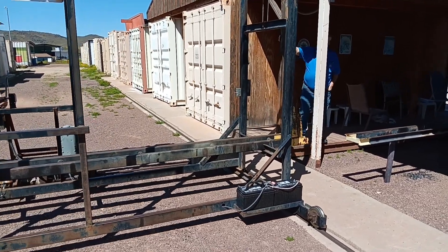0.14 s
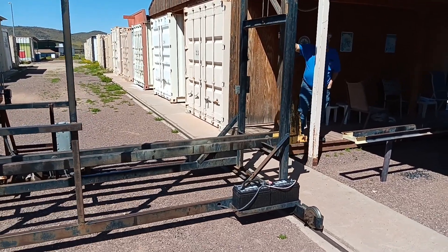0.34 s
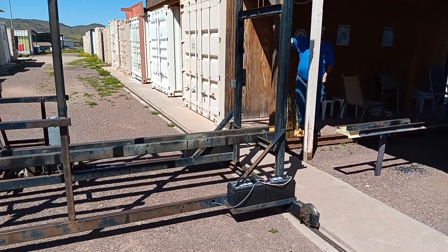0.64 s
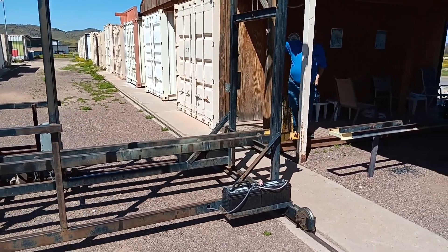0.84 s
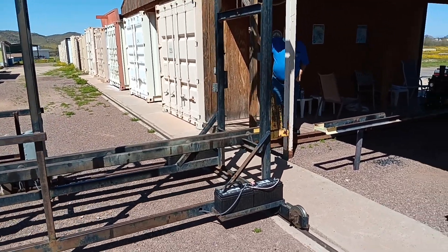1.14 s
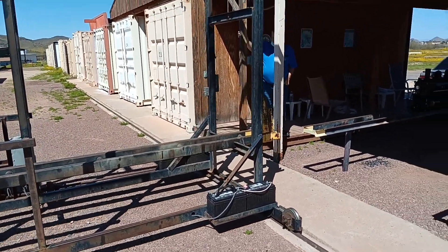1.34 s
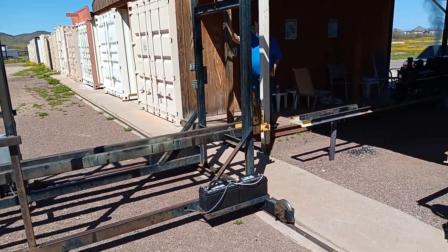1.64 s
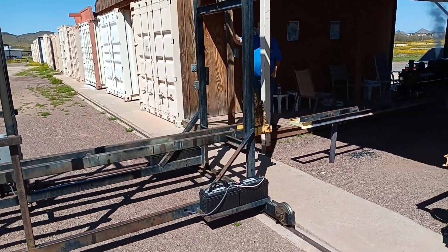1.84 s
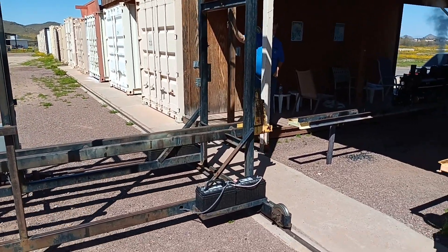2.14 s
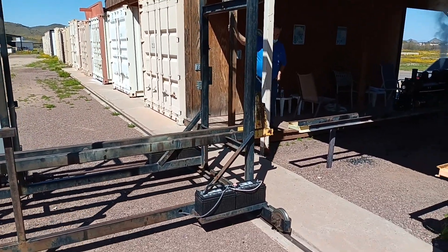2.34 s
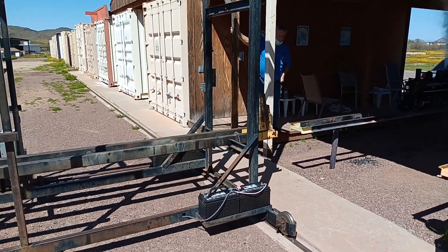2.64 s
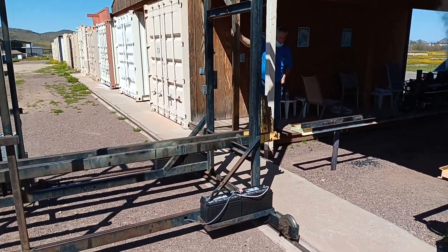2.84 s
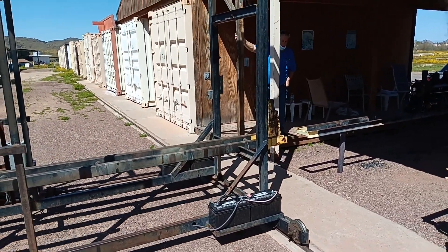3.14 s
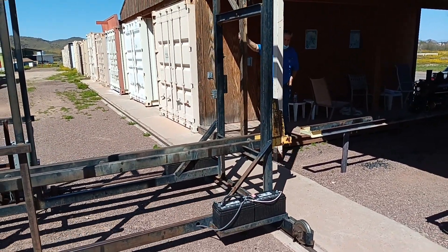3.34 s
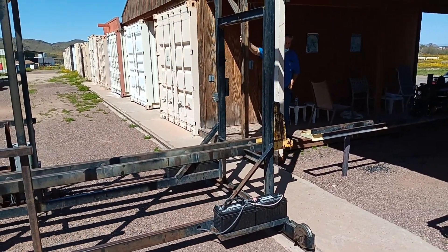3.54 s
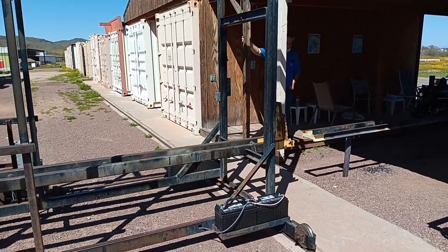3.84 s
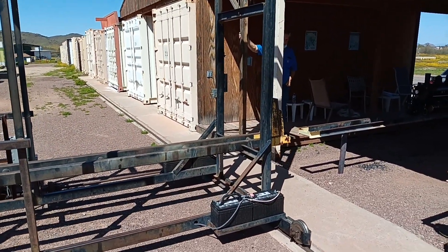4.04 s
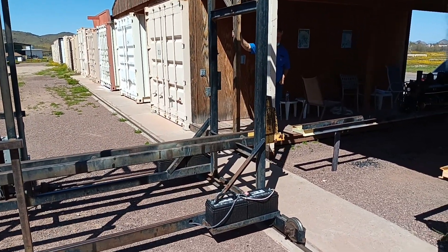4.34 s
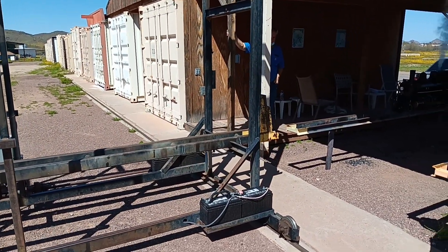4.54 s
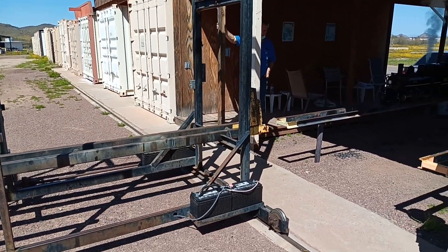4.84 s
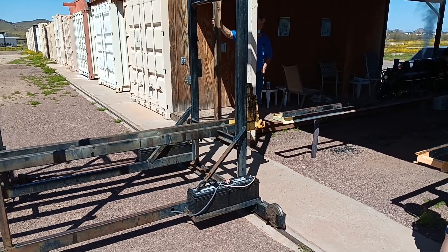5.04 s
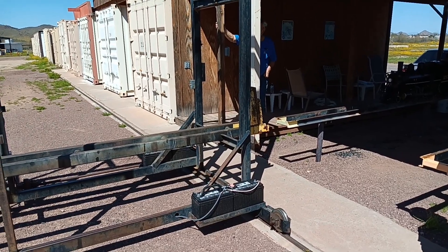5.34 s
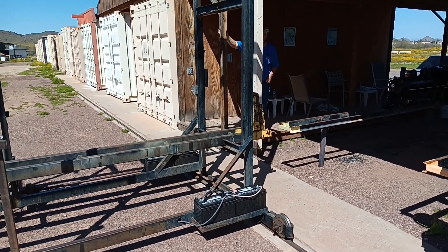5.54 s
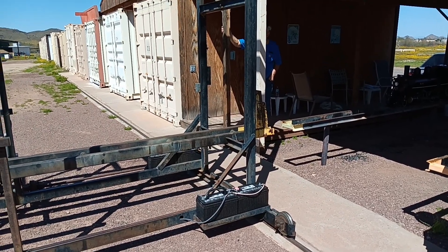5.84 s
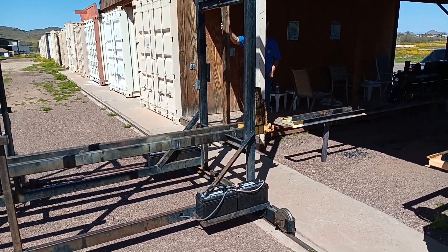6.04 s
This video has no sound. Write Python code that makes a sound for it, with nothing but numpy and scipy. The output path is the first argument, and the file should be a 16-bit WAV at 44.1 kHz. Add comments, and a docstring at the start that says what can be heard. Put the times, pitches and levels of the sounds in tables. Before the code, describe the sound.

From 0 s a small steam locomotive blows off a loud, bright, continuous hiss, slightly sputtering, with thin drifting whistly edges around 10 kHz. A geared motor whines with gritty grinding at a steady pitch until about 0.5 s, then coasts down; soft wind slaps hit the right side near 0.7 s. A short push at 1.35 s lifts the whine before it sinks away. Steel clanks and jangles at 2.3-2.4 s, with smaller rattles until 3.4 s. The motor kicks up again at 3.8 s and 4.2 s, with heavy dull thuds near 4.17 s and low wheel rumble, slowing to a soft bump at 5 s. At 5.05 s the steam cuts off abruptly. A clank at 5.35 s rings in the shed, then a faint uneven leak, a tiny spit and light clinks at 5.9 s, over low hum, distant yard rumble and breeze.

```python
"""From the start a miniature steam locomotive blows off steam: noise coloured by valve hollows and two drifting peaks.
A geared motor drives a steel transfer table in bursts: gear tones and grinding whine up under power and coast down.
The frame clanks (ringing modes, rattle, jangle) from 2 s; thuds and rumbling wheels join the later bursts.
At 5.05 s the valve shuts, leaving a thin noisy leak that spits once. A low two-tone hum, yard rumble and breeze
lie under it all; the shed and a row of containers answer as diffuse tails. Table levels are relative."""
import sys
import numpy as np
from scipy import signal
from scipy.fft import rfft, irfft, next_fast_len
from scipy.io import wavfile
from scipy.ndimage import uniform_filter1d, map_coordinates

SR = 44100
rng = np.random.default_rng(int(sys.argv[2]) if len(sys.argv) > 2 else 0)


def transcribe(u):
    """Save the signal u as a 16-bit wav file named by the first command-line argument.

    u: samples, shape (n,) or (channels, n), limited to [-1, 1]; the rate is SR.
    q: integer samples, one column per channel.
    """
    v = np.clip(np.atleast_2d(u).T, -1, 1)
    q = np.round(v * 32767).astype(np.int16)
    wavfile.write(sys.argv[1], SR, q)


N = 272962  # samples, 6.19 s


# steam jet: time_s, level_db
JET_LEVEL = [(0.0, -17), (0.9, -17), (0.98, -18.7), (1.08, -17.3), (1.17, -15.3), (1.25, -16.5),
             (1.98, -17.4), (2.15, -16.5), (2.55, -17), (3.0, -15.8), (3.2, -16.7), (3.77, -16.5),
             (3.8, -18.5), (4.05, -17.5), (4.6, -16.6), (5.03, -16.7)]
# two sharp drifting resonances: time_s, upper_hz, upper_db, lower_db (both against the jet)
JET_PEAKS = [(0, 9550, -10, -6.5), (.43, 9980, -8, -8), (.85, 9600, -10, -7.5), (1.15, 9980, -6, -17),
             (1.65, 9680, -6, -21), (2.12, 10080, -3.5, -22), (2.45, 10020, -6.5, -19),
             (3.05, 10300, -5.5, -17), (3.3, 10200, -14, -17), (3.9, 10000, -12, -19),
             (4.6, 10200, -6, -22), (5.04, 10050, -6.5, -23)]
# leak past the shut valve: time_s, level_db
LEAK_LEVEL = [(5.22, -48), (5.29, -41.5), (5.5, -46.5), (5.63, -43), (5.78, -52), (5.92, -50.5), (6.1, -41),
              (6.19, -42.5)]
# jet spectrum: freq_hz, density_db_per_hz
JET_SPECTRUM = [(200, -58), (800, -44), (1200, -32), (1900, -18.5), (2700, -16.5), (3600, -12.5),
                (4600, -8), (6700, -3.5), (8000, -1), (9300, 0), (10400, .5), (11200, -5), (13000, -7.5),
                (15400, -14)]
# leak spectrum: freq_hz, density_db_per_hz
LEAK_SPECTRUM = [(500, -28), (2000, -15.5), (3600, -22), (4200, -18), (4550, -8), (4850, -15), (5400, -8),
                 (6300, -6), (8200, -2.5), (10000, -1.5), (11500, -12.5), (13000, -25), (15000, -28)]
# hollow resonances of valve and cab: freq_hz, width_hz, gain_db
VALVE_HOLLOWS = [(6850, 600, 0), (7900, 130, 1), (8650, 300, 1), (9300, 600, 1)]
# jet colour between the ears: freq_hz, left_minus_right_db
JET_EAR_BALANCE = [(2200, .5), (3800, -1.5), (5400, 1), (6600, 4), (7800, 6), (8700, 3.5), (9500, -1),
                   (11200, -3.5), (13500, -.5)]
# straight path and nearby walls: left_ear_lag_ms, gain_db
JET_ARRIVALS = [(.655, -1), (.52, -3), (-.42, -5)]
SHUT_S = 5.05
SHUT_DB_PER_S, SCATTER_DB_PER_S = 900, 300  # flow collapses as the valve seats; its wall echo dies more slowly
LOWER_RATIO = .705  # lower resonance frequency / upper
PEAK_LEFT_DB, PEAK_RIGHT_DB = -3, 6.8  # upper resonance beams to the right ear


def steam():
    """Turbulent jet rings the valve's hollows while two resonances drift; water in the steam makes it sputter."""
    jet_db, = curves(JET_LEVEL)
    peak_hz, upper_db, lower_db = curves(JET_PEAKS)
    leak_db, = curves(LEAK_LEVEL)
    shut_for_s = np.maximum(clock() - SHUT_S, 0)

    def narrow_noise(hz):
        """Noise band around a moving centre: two random carriers in quadrature."""
        return wobble(470) * np.cos(turns(hz)) + wobble(470) * np.sin(turns(hz))

    def blast():
        """Bare jet noise plus the part that rings the hollows."""
        hollow = unit(resonate(noise(JET_SPECTRUM, patchy_db=3), VALVE_HOLLOWS))
        return unit(noise(JET_SPECTRUM, patchy_db=1.8) + amp(-6) * hollow)

    singing = np.array([
        amp(upper_db + ear_db) * narrow_noise(peak_hz) + amp(lower_db) * narrow_noise(LOWER_RATIO * peak_hz)
        for ear_db in (PEAK_LEFT_DB, PEAK_RIGHT_DB)])
    arrivals = sum(amp(db) * from_right(blast(), lag_ms) for lag_ms, db in JET_ARRIVALS)
    direct = amp(-SHUT_DB_PER_S * shut_for_s) * arrivals
    diffuse = amp(-1) * np.array([blast(), blast()])
    scattered = amp(-SCATTER_DB_PER_S * shut_for_s) * (diffuse + singing)
    jet = amp(jet_db - 1.2 + .3 * wobble(9)) * (direct + scattered)
    jet = filtered(jet, lambda hz: amp(along(JET_EAR_BALANCE, hz) * np.array([[.5], [-.5]])))

    hiss = wide(lambda: noise(LEAK_SPECTRUM, patchy_db=1.0), spread_db=4)
    leak = amp(leak_db + 1.2 + .9 * wobble(30)) * hiss
    sputter_db = 0.5 * wobble(140) + 0.45 * wobble(1100)
    return (jet + place(leak, lag_ms=.3, wet_db=0, left_db=.3)) * amp(sputter_db)


# spitting valve: start_s, level_db, t60_s
SPIT_EVENTS = [(5.912, -32, .08)]


def spits():
    """A drop of water bursts through the leaking valve: a decaying burst of high noise."""
    spit_spectrum = [(3000, -30), (6000, -12), (7600, 0), (9500, 0), (14000, -25)]  # freq_hz, density_db_per_hz
    return place(bursts(SPIT_EVENTS) * noise(spit_spectrum), lag_ms=1.3, wet_db=-7, left_db=.3)


# gear tones: mesh_rate_multiple, full_speed_db, db_per_octave_of_speed
GEAR_TONES = [(0.3396, -8, 2), (.385, -18, 0), (0.6816, -7.5, 3), (.718, -7.5, 10), (.95, -12, 0),
              (1, 0, 1), (1.04, -11, 0), (2, -11, 1)]
# gear case response: freq_hz, gain_db
CASE_RESPONSE = [(280, -24), (400, -15), (490, -11), (610, -10), (740, -2), (900, -6), (1130, -2.5),
                 (1240, -1.5), (1350, 1), (1455, 2.5), (1540, -.5), (1640, -8), (1780, -7), (1950, -12),
                 (2110, -15), (2400, -11)]
# case mode that rings on after a tone crosses it: freq_hz, width_hz, gain_db
CASE_RINGING = [(1447, 14, 0)]
# grinding teeth: freq_hz, density_db_per_hz
GRIND_SPECTRUM = [(100, -37), (270, -15), (550, -11.5), (800, -6), (1100, -3), (1500, -1.5), (2100, -2),
                  (2900, -5.5), (4000, -7), (8000, -35)]
# panels the grinding keeps ringing: freq_hz, width_hz, gain_db
PANEL_MODES = [(403, 10, 6), (815, 75, -8), (1455, 70, -2)]
# gear tone level: time_s, level_db
WHINE_LEVEL = [(0, 0), (.45, .5), (.6, -1.5), (.78, -2), (.88, 1.5), (1.0, 2.5), (1.12, -1), (1.32, -3.5),
               (1.48, -1), (1.7, -2), (1.95, -3.5), (3.85, 4), (3.97, -1.5), (4.35, -2), (4.55, -1.5),
               (4.72, 4), (4.9, -2)]
TIGHT_ROUGH, SLACK_ROUGH = .3, .6  # tone roughness 0-1: full speed, slack teeth
DRIVE_DB, KNEE_HZ = -21.2, 1000  # drive gain; mesh rate below which it fades
WHINE_POWER, ROLL_POWER, DRONE_POWER = 1.75, 1.5, 1.05  # exponents of effort


def drive():
    """Gear tones swell across the case's resonances, rougher below full speed; teeth grind beneath them."""
    mesh_hz = mesh_rate()
    whine_db, = curves(WHINE_LEVEL)
    speed = mesh_hz / FULL_HZ
    octaves = np.log2(speed)
    rough = np.interp(speed, [.8, 1], [SLACK_ROUGH, TIGHT_ROUGH])
    phase = turns(mesh_hz * (1 + 0.008 * rough * wobble(60)))

    tones = sum(amp(db + slope * octaves + 4.5 * rough * wobble(35)) * np.sin(k * phase + rough * wobble(130))
                for k, db, slope in GEAR_TONES)
    cased = filtered(tones, lambda hz: amp(along(CASE_RESPONSE, hz))) + resonate(tones, CASE_RINGING)
    whine = place(cased, lag_ms=1.314, wet_db=-5, left_db=4.5)

    teeth = wide(lambda: noise(GRIND_SPECTRUM, patchy_db=2.5), spread_db=2.0) * amp(2.47 * wobble(70))
    drone = wide(lambda: resonate(rng.standard_normal(N), PANEL_MODES), spread_db=-4.5)
    effort = mesh_hz / np.hypot(mesh_hz, KNEE_HZ)
    grinding = amp(-8) * effort ** ROLL_POWER * teeth + amp(-16) * effort ** DRONE_POWER * drone
    rolling = place(grinding, lag_ms=1.307, wet_db=-4, left_db=1.5)
    return amp(DRIVE_DB) * (amp(whine_db) * effort ** WHINE_POWER * whine + rolling)


# motor power: on_s, off_s
MOTOR_PUSHES = [(-3, .482), (1.342, 1.463), (3.828, 3.973), (4.226, 4.328)]
KICK_HZ, FULL_HZ, SPIN_UP_S = 529, 2116, .255  # mesh rate: jerk from rest, full speed; time constant under power
FRICTION_HZ_PER_S, DRAG_S = 1023, 2.893  # coasting: steady braking; drag time constant


def mesh_rate():
    """Gear mesh rate in Hz: pushes pull it towards full speed; friction and drag then slow it to rest."""
    t, hz = clock(), np.zeros(N)
    brake_hz = FRICTION_HZ_PER_S * DRAG_S
    for on_s, off_s in MOTOR_PUSHES:
        start_hz = max(np.interp(on_s, t, hz), KICK_HZ)
        powered_s = np.clip(t, on_s, off_s) - on_s
        powered = FULL_HZ + (start_hz - FULL_HZ) * np.exp(-powered_s / SPIN_UP_S)
        coasting = (powered + brake_hz) * np.exp(-np.maximum(t - off_s, 0) / DRAG_S) - brake_hz
        hz = np.where(t < on_s, hz, coasting)
    return uniform_filter1d(np.maximum(hz, 1), size=SR // 33)


# frame jolts and rocks back: start_s, level_db, t60_s, ring_db, jangle_db (last two against level_db)
CLANK_EVENTS = [(2.13, -42, .2, 0, -3), (2.3, -26, .4, 2, -2), (2.385, -28, .38, 2, -2),
                (2.655, -42, .4, -2, 3), (2.7, -42, .5, -2, 5), (2.81, -37, .4, -2, -2),
                (2.9, -44, .6, -2, 0), (3.035, -42.5, .31, -2, 0), (3.113, -36, .2, -2, 0),
                (3.394, -40, .3, -2, 0), (3.826, -36, .2, -1, -3), (5.09, -42, .35, -4, 0),
                (5.262, -47.5, .4, -5, 5), (5.349, -29, .3, -3, 0), (5.403, -34.5, .33, -5, 3),
                (5.936, -44, .4, 0, -14), (5.953, -43, .36, 4, -14), (6.07, -52, .4, -2, 3)]
# steel frame modes: freq_hz, width_hz, gain_db
FRAME_MODES = [(640, 45, -4), (885, 35, 2), (1260, 110, 0), (1440, 50, -4), (1640, 45, 2), (2150, 60, -7)]
# loose steel rattle: freq_hz, density_db_per_hz
RATTLE_SPECTRUM = [(200, -20), (380, -4), (600, -2), (880, 0), (1250, 2), (1700, 1), (2100, -7),
                   (2800, -18), (4000, -26), (9000, -45)]
# bright jangle of hard contacts: freq_hz, density_db_per_hz
JANGLE_SPECTRUM = [(1000, -25), (1900, -3), (2300, 0), (2800, -2.5), (3400, -11), (4400, -11), (9000, -28)]


def clanks():
    """Each jolt rings the frame's modes while loose steel rattles on; harder contacts add a bright jangle."""
    rattle = bursts([(s, db, t60) for s, db, t60, _, _ in CLANK_EVENTS])
    jangle = bursts([(s, db + jangle_db, t60) for s, db, t60, _, jangle_db in CLANK_EVENTS], rise_s=.003)
    ringing = bursts([(s, db + ring_db, t60) for s, db, t60, ring_db, _ in CLANK_EVENTS], rise_s=.003)

    chatter = rattle * wide(lambda: noise(RATTLE_SPECTRUM, patchy_db=3), spread_db=-1.0)
    chatter += amp(-6) * jangle * wide(lambda: noise(JANGLE_SPECTRUM, patchy_db=2.5), spread_db=-1.0)
    ring = ringing * unit(resonate(rng.standard_normal(N), FRAME_MODES))
    clank = amp(-.5 + 2.8 * wobble(220)) * chatter + amp(-1) * ring
    return place(clank, lag_ms=1.332, wet_db=-3, left_db=3.5)


# dull thuds: start_s, level_db, t60_s, brightness_db_per_octave
THUD_EVENTS = [(4.167, -25, .05, 0), (4.171, -20.5, .055, -1), (4.187, -19.5, .07, 1), (4.99, -31, .05, -1),
               (5.006, -30, .07, -1)]
# thud modes: freq_hz, level_db
THUD_RING = [(88, -6), (172, -7), (250, 0), (307, 0), (385, -15)]


def thuds():
    """Soft, heavy bumps ring briefly at low pitch; the softer the contact, the more the low modes prevail."""
    pivot_hz = 250
    ring = 0
    for s, db, t60, bright in THUD_EVENTS:
        for hz, mode_db in THUD_RING:
            level_db = db + mode_db + bright * np.log2(hz / pivot_hz)
            ring = ring + bursts([(s, level_db, t60)]) * np.sin(2 * np.pi * hz * (clock() - s))
    return place(amp(4) * ring, lag_ms=1.3, wet_db=-14, left_db=0)


# wheel rumble: time_s, level_db
WHEEL_LEVEL = [(3.85, -72), (3.98, -47), (4.3, -43.5), (4.6, -45), (4.85, -47.5), (5.05, -45), (5.3, -68),
               (5.5, -85)]
# wheel rumble: freq_hz, density_db_per_hz
WHEEL_SPECTRUM = [(60, -20), (130, 0), (250, -1), (340, -5), (450, -12), (700, -32)]


def wheels():
    """The table's wheels rumble over a rough stretch of rail: patchy low noise with an uneven level."""
    level_db, = curves(WHEEL_LEVEL)
    rumble = amp(level_db + 2 * wobble(18)) * noise(WHEEL_SPECTRUM, patchy_db=3)
    return place(rumble, lag_ms=1.3, wet_db=-6, left_db=0)


# air slaps the right microphone port: centre_s, peak_db, half_length_s
AIR_SLAPS = [(.671, -18.5, .0055), (.6877, -17, .0036), (.711, -25, .005)]


def buffets():
    """Each slap is one pressure swing at the right port, suction before and after; faint at the left."""
    swing = 0
    for s, db, half_s in AIR_SLAPS:
        u = (clock() - s) / half_s
        swing = swing + amp(db) * (1 - 2 * u ** 2) * np.exp(-u ** 2)
    return swing * amp([[-22], [0]])


# machine hum: time_s, pitch_hz, octave_level_db
HUM_COURSE = [(0, 67.5, -60), (.7, 69.7, -52), (2.1, 69.1, -56), (2.42, 68, -43), (3.1, 68, -44.5),
              (5.3, 67.8, -51), (5.9, 67.6, -66)]
HUM_DB = -37.6  # fundamental, before wavering and ear balance


def hum():
    """A machine drones at a slightly drifting pitch; fundamental and octave waver separately."""
    pitch_hz, octave_db = curves(HUM_COURSE)
    phase = turns(pitch_hz)
    fundamental = amp(HUM_DB + 1.2 * wobble(10)) * np.sin(phase)
    octave = amp(octave_db + 2.5 + 1.2 * wobble(8)) * np.sin(2 * phase)
    return (fundamental + octave) * amp([[-.4], [.4]])


# distant rumble: freq_hz, density_db_per_hz
YARD_SPECTRUM = [(15, -23), (40, -2.5), (70, 3.5), (115, 1.5), (180, -5), (260, -16), (345, -8.5),
                 (480, -30.5), (1000, -38), (3000, -54), (8000, -77)]
# gusts on the microphone: centre_s, level_db, half_length_s
GUST_EVENTS = [(.35, -48, .2), (.7, -43, .045), (1.91, -42.5, .06), (2.45, -46, .2), (2.65, -42, .035),
               (3.72, -52, .08), (4.95, -55, .2)]
CALM_DB = -59  # breeze between gusts, relative like the gusts


def yard():
    """Distant outdoor rumble, and a light breeze that puffs at each microphone port."""
    rumble = amp(-45.5 + 2.3 * wobble(5)) * wide(lambda: noise(YARD_SPECTRUM, patchy_db=4), spread_db=-1.5)
    # freq_hz, density_db_per_hz
    puff_spectrum = [(10, -12), (25, -5), (48, 0), (90, -3), (200, -39), (500, -70)]
    puffs = wide(lambda: noise(puff_spectrum), spread_db=3)
    gusts = sum(amp(db) * np.exp(-((clock() - s) / half_s) ** 2) for s, db, half_s in GUST_EVENTS)
    breeze = amp(CALM_DB) + gusts
    return rumble + breeze * amp(1.5 + 2.5 * wobble(6)) * puffs


# decay of the wall reflections: freq_hz, t60_s
SHED_DECAY = [(100, 0.43), (1000, 0.41), (4000, 0.14), (12000, 0.19)]


def place(x, lag_ms, wet_db, left_db):
    """Direct sound reaches the left ear late; the walls add a diffuse tail to each side."""
    pair = np.broadcast_to(x, (2, N))
    hz, t, z = signal.stft(rng.standard_normal((2, SR // 2)), SR, nperseg=256)
    fade = amp(-60 * t / along(SHED_DECAY, hz)[:, None])
    tail = signal.istft(z * fade / np.linalg.norm(fade, axis=1, keepdims=True), SR, nperseg=256)[1]
    tail /= np.linalg.norm(tail, axis=1, keepdims=True)
    lead = SR // 4  # the walls are already ringing at the start
    fed = np.pad(pair, ((0, 0), (lead, 0)), mode="reflect")
    wet = signal.fftconvolve(fed, tail, axes=1)[:, lead:lead + N]
    direct = np.array([from_right(pair[0], lag_ms)[0], pair[1]])
    mix = (direct + amp(wet_db) * wet) / np.hypot(1, amp(wet_db))
    return mix * amp([[left_db / 2], [-left_db / 2]])


def from_right(x, lag_ms):
    """A sound from the right reaches the left ear late (early if lag_ms is negative)."""
    return np.array([filtered(x, lambda f: np.exp(-2j * np.pi * f * lag_ms / 1000)), x])


def wide(source, spread_db):
    """A broad source: one part reaches both ears, another part only one each."""
    return unit(source() + amp(spread_db) * np.array([source(), source()]))


def bursts(rows, rise_s=.0015):
    """Summed envelope of (start_s, level_db, t60_s) blows that rise quickly and die away."""
    out = np.zeros(N)
    for s, db, t60 in rows:
        age_s = np.maximum(clock() - s, 0)
        out += amp(db - 60 * age_s / t60) * (1 - np.exp(-age_s / rise_s))
    return out


def noise(colour, patchy_db=0):
    """Noise of rms 1 with the given spectrum; patches of it swell and fade."""
    z = signal.stft(rng.standard_normal(N), nperseg=512)[2]
    field = uniform_filter1d(rng.standard_normal(z.shape), size=4, axis=0)  # smooth over frequency
    field = uniform_filter1d(field, size=50, axis=1)  # smooth over time
    patchy = signal.istft(z * amp(patchy_db * unit(field)), nperseg=512)[1][:N]
    return unit(filtered(patchy, lambda hz: amp(along(colour, hz))))


def resonate(x, modes):
    """x through a body with (freq_hz, width_hz, gain_db) resonances of alternating sign."""
    def response(f):
        return sum((-1) ** k * amp(db) * 1j * f * w / (c * c - f * f + 1j * f * w)
                   for k, (c, w, db) in enumerate(modes))
    return filtered(x, response)


def filtered(x, response):
    """x times a complex response of frequency."""
    m = next_fast_len(N + SR // 2)
    return irfft(rfft(x, m) * response(np.fft.rfftfreq(m, 1 / SR)), m)[..., :N]


def along(points, hz):
    """(freq_hz, value) points interpolated on a log frequency axis."""
    f, v = np.transpose(points)
    return np.interp(np.log(hz + 1), np.log(f + 1), v)


def curves(rows):
    """One value per sample for each column after the time."""
    s, *cols = np.transpose(rows)
    return [np.interp(clock(), s, c) for c in cols]


def wobble(rate):
    """A smooth random curve, rate knots a second."""
    return map_coordinates(rng.standard_normal(int(N * rate / SR) + 4), [clock() * rate])


def turns(hz):
    """Running phase of a changing frequency, in radians."""
    return 2 * np.pi * np.cumsum(hz) / SR


def clock():
    """The time of every sample, in seconds."""
    return np.arange(N) / SR


def amp(db):
    """Decibels to gain."""
    return 10 ** (np.asarray(db) / 20)


def unit(x):
    """Scale to rms 1."""
    return x / np.sqrt(np.mean(x ** 2) + 1e-20)


def scene():
    """Steam, transfer table and yard together."""
    locomotive = steam() + spits()
    table = drive() + clanks() + thuds() + wheels()
    return locomotive + table + buffets() + hum() + yard()


TOP_HZ = 15600


def record(dry):
    """Keep nothing at or above the band limit."""
    return filtered(dry, lambda hz: hz < TOP_HZ)


dry = scene()
out = record(dry)
transcribe(out)
```